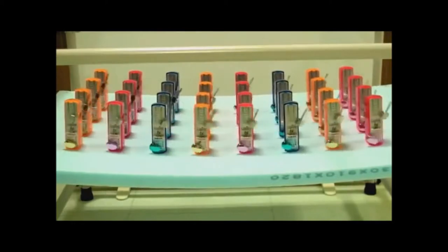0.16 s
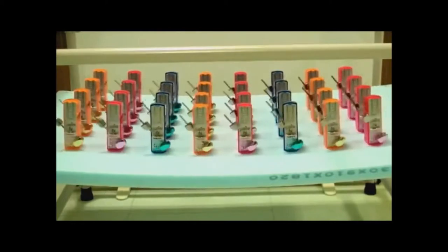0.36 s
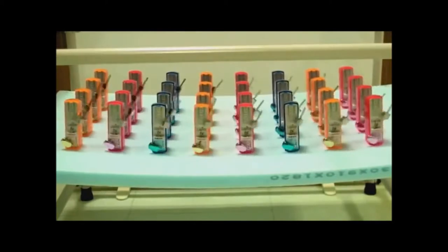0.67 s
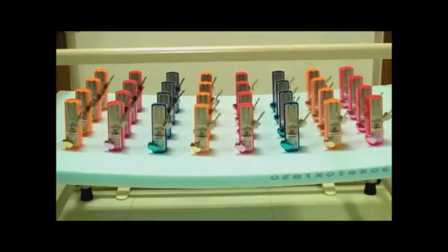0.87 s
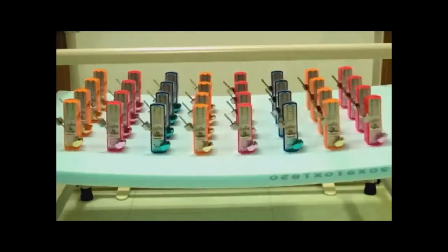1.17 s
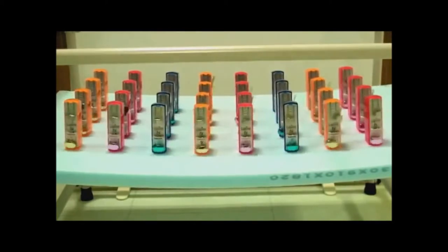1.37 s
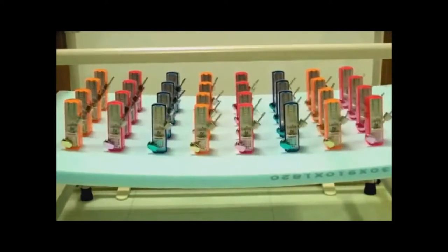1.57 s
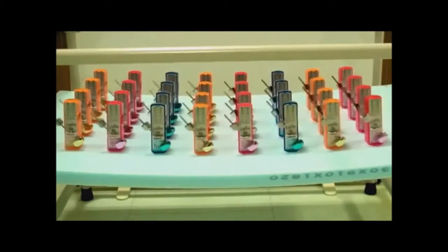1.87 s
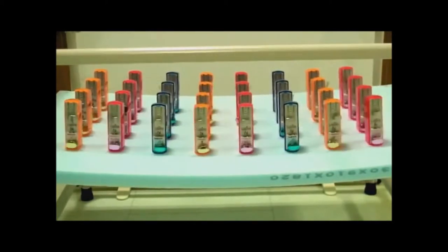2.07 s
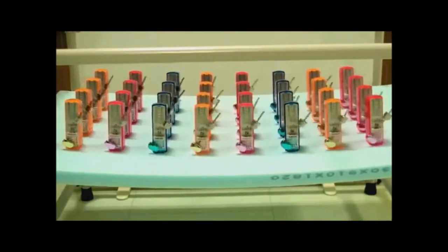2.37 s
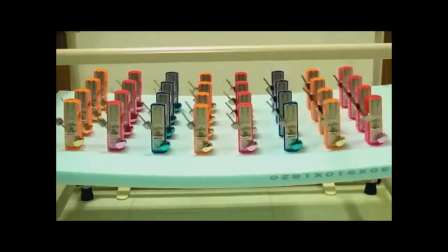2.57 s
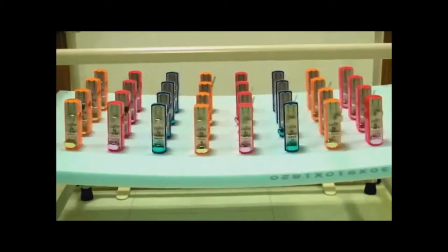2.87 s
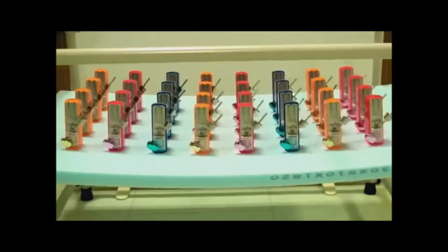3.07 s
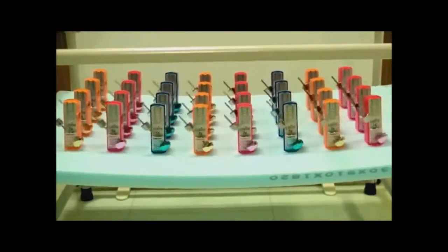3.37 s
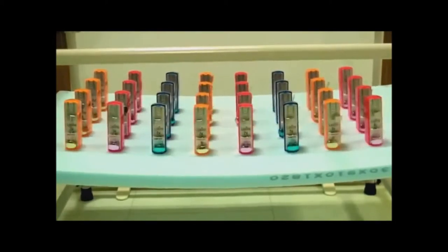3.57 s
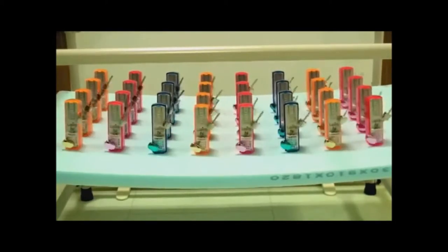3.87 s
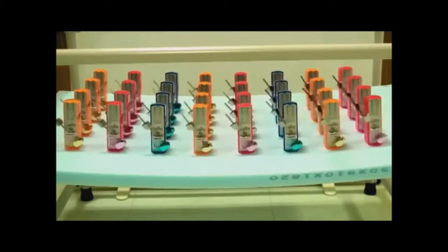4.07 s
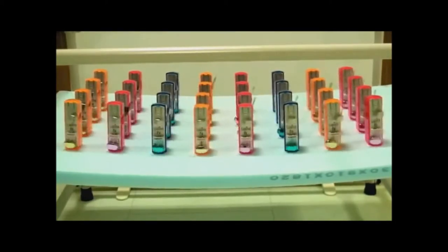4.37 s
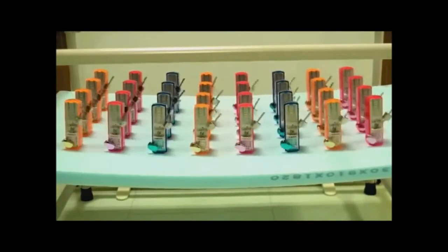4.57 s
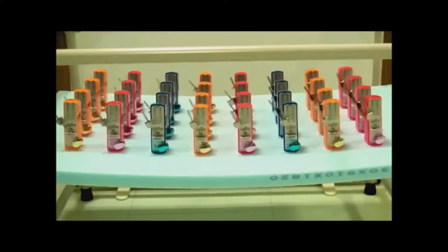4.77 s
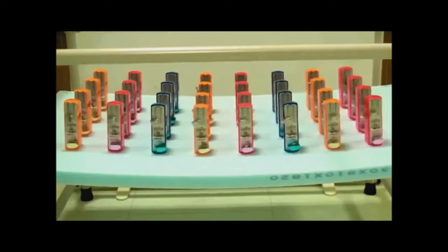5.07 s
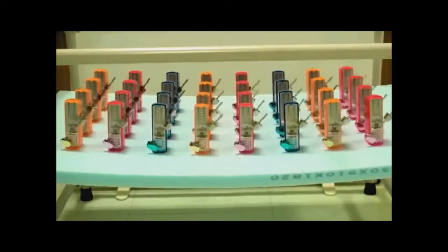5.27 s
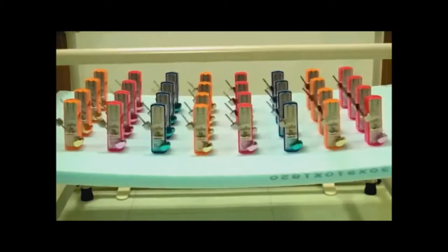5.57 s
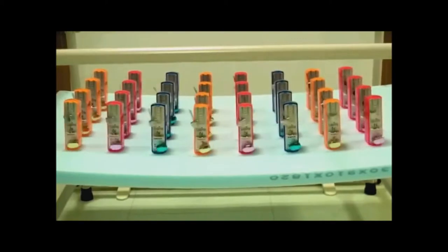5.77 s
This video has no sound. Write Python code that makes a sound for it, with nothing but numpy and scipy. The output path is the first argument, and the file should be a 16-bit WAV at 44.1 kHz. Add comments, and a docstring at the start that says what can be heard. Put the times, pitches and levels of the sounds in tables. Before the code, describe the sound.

Dozens of small plastic mechanical metronomes tick almost in step on a shared board, a little under three beats a second. Each beat is a brief clatter of sharp clicks with a slight ring and a light knock, alternating tick and tock. The pulse stays even throughout. The microphone is close, in a hard-walled room with a short echo and faint, steady ventilation.

```python
"""A hard-walled room opens on the dying tail of an earlier beat, over faint, steady ventilation.
Then thirty-two small plastic metronomes, swinging almost in step on a hanging board, tick sixteen beats.
Each beat swells out of a faint hiss into a tenth of a second of clatter: every escapement cracks,
rings its case near 1.9 kHz and knocks on the board. The room answers with a short tail and a low boom."""
import sys
import numpy as np
from scipy import signal
from scipy.fft import rfft, irfft, next_fast_len
from scipy.io import wavfile

SR = 44100
rng = np.random.default_rng(int(sys.argv[2]) if len(sys.argv) > 2 else 0)


def materialize(psi):
    """Save the field psi as 16-bit PCM at rate SR to the path in sys.argv[1].

    A 1-D psi becomes a single channel; in a 2-D psi each row is a channel.
    """
    bounded = np.clip(np.atleast_2d(psi).T, -1, 1)
    quanta = np.round(bounded * 32767).astype(np.int16)
    wavfile.write(sys.argv[1], SR, quanta)


N = 261513
TICK_T = np.arange(4096) / SR
TICK_HZ = np.fft.rfftfreq(len(TICK_T), 1 / SR)


def amp(db):
    """Decibels to gain."""
    return 10 ** (np.asarray(db) / 20)


def curve(points, hz):
    """Reads a table along a log-frequency axis."""
    f, value = np.transpose(points)
    return np.interp(np.log(hz + 1), np.log(f + 1), value)


def unit(x):
    """Scales each row to an energy of one."""
    return x / np.linalg.norm(x, axis=-1, keepdims=True)


def colour(x, eq):
    """A causal EQ of unit energy: its table sets only the tone."""
    log_gain = np.log(amp(curve(eq, abs(np.fft.fftfreq(4096, 1 / SR)))))
    taps = np.fft.ifft(np.exp(np.conj(signal.hilbert(log_gain)))).real
    return signal.oaconvolve(x, unit(taps[:len(taps) // 2])[None], axes=1)[:, :N]


# Stereo image of the room at full width: f/Hz, correlation between the microphones
ROOM_IMAGE = [(100, 0.59), (300, 0.91), (600, 1), (1200, 1), (1900, 0.77), (3000, 0.8), (4500, 0.28),
              (7000, -0.27), (12000, -0.41)]
def pair(x, width=0.63):
    """Blends two unrelated channels until they are as alike as at two close microphones."""
    size = next_fast_len(x.shape[1])
    a, b = rfft(x, size)
    apart = np.clip(width * (1 - curve(ROOM_IMAGE, np.fft.rfftfreq(size, 1 / SR))) / 2, 0, 1)
    mid, side = a * np.sqrt(1 - apart), b * np.sqrt(apart)
    return irfft([mid + side, mid - side], size)[:, :x.shape[1]]


# EQ of the opening tail, peaking where board and cases ring: f/Hz, level/dB
TAIL_EQ = [(100, -22), (300, -9), (430, 8), (1000, -10), (1600, -5), (1860, 8), (2200, -8),
           (5000, -8), (11000, -24)]
def opening_tail(db=-42, t60=1.0):
    """Fading noise: an earlier beat is still dying in the room."""
    noise = pair(rng.standard_normal((2, N)))
    return colour(noise, TAIL_EQ) * amp(db - 60 * np.arange(N) / SR / t60)


# EQ of the air bed: f/Hz, level/dB
AIR_EQ = [(20, -23), (45, -15), (80, 0), (160, 0), (280, -4), (450, 5.5), (1000, -3.5), (3000, -4.5),
          (7000, -12.5), (12000, -23.5)]
def ventilation(db=-50, side_db=-6):
    """A steady, soft rush of air."""
    mid, side = colour(rng.standard_normal((2, N)), AIR_EQ)
    return amp(db) * (mid + amp(side_db) * np.array([side, -side]))


# The pulse, forward and back swing in turn, cued on the first strike: t/s, level/dB
BEATS = [(.082, 1), (.438, -1), (.832, 0.5), (1.1871, -0.5), (1.5797, .5), (1.9356, -0.5), (2.3271, 1),
         (2.6836, -0.5), (3.0753, 0.5), (3.4297, 0), (3.8236, 0.5), (4.1762, -0.5), (4.5702, 1),
         (4.9253, -0.5), (5.3183, 0), (5.674, 0)]
# Foreground metronomes, a row each, relative to the beat:
# t/s, crack level/dB, ring level/dB on the forward swing, then the same on the back swing
NEAR_STRIKES = [(0, -14.5, -18, 0, -16, -25), (.007, -18, -25, .018, -18, -19.5),
                (0.0176, -17, -16.5, .027, -17.5, -20), (.026, -22.5, -22, .0315, -17, -26),
                (.032, -20.5, -22, .036, -16.5, -17), (.041, -18.5, -19.5, .047, -17, -18.5),
                (.046, -20, -29, .057, -17.5, -18.5), (0.0517, -19.5, -15, .063, -17, -14),
                (0.06, -23.5, -25, .073, -18.5, -14.5), (.065, -20.5, -19, .084, -16, -17.5),
                (.073, -20.5, -29, .095, -31.5, -19), (0.105, -23.5, -22, .103, -21, -25)]
def near_ticks(wander_s=.002, uneven_db=2):
    """The first metronome leads; the others stray a little. Gives times, crack and ring levels."""
    patterns = np.hsplit(np.array(NEAR_STRIKES), 2)
    follows = np.arange(len(NEAR_STRIKES)) > 0
    uneven = uneven_db * follows
    ticks = []
    for k, (start, db) in enumerate(BEATS):
        lag, crack, ring = patterns[k % 2].T
        stray, crack_luck, ring_luck = rng.uniform(-1, 1, (3, len(NEAR_STRIKES)))
        times = start + follows * (lag + wander_s * stray)
        ticks.append([times, db + crack + uneven * crack_luck, db + ring + uneven * ring_luck])
    return np.hstack(ticks)


def lead_in_hiss(ticks, swell_s=0.026, hiss_db=-20.5):
    """A faint hiss in the crack's colour swells into each near tick and softens its attack."""
    t, envelope = np.arange(N) / SR, np.zeros(N)
    for s, crack_db, _ in ticks.T:
        span = slice(round((s - swell_s) * SR), round(s * SR))
        envelope[span] += amp(crack_db + hiss_db) * np.sqrt(abs(1 - (s - t[span]) / swell_s))
    return colour(pair(rng.standard_normal((2, N))) * envelope, CRACK_EQ)


def decay(t60):
    """The envelope of a struck part."""
    return amp(-60 * TICK_T / t60)


def place(times, db, sounds, bearing, pan_db, mic_delay_s=1.8e-5):
    """Lays one hit at each time, panned to its bearing by delay and level."""
    gain = amp(db) * np.sqrt(.003 * SR)  # level as if the energy fell within 3 ms
    spectra = rfft(unit(sounds) * gain[:, None])
    lead = np.exp(1j * np.pi * mic_delay_s * bearing[:, None] * TICK_HZ)
    pan = lead * amp(pan_db * bearing[:, None])
    hits = irfft(np.stack([spectra * pan, spectra / pan], 1))
    fade = np.cos(np.pi / 2 * TICK_T / TICK_T[-1])
    out = np.zeros((2, N + SR))
    for s, hit in zip(times, hits):
        start = max(round(s * SR), 0)
        out[:, start:start + len(TICK_T)] += hit * fade
    return out[:, :N]


# Bright EQ of the escapement's crack: f/Hz, level/dB
CRACK_EQ = [(60, -51), (250, -30.5), (600, -7), (1050, -14), (1500, -3.5), (2200, 0), (2950, 2.5),
            (3450, -1), (4100, 1), (5000, -4), (5800, -2), (6500, -5), (8600, -7.5), (11000, -19.5)]
def cracks(times, db, bearing, rise_s=0.00019, snap_t60=0.029, rattle_t60=0.05, rattle_db=-13):
    """The pallet hits the escape wheel: a hard snap, then the works rattle briefly."""
    grain = rng.standard_normal((len(times), len(TICK_T)))
    attack = 1 - np.exp(-TICK_T / rise_s)
    burst = grain * attack * (decay(snap_t60) + amp(rattle_db) * decay(rattle_t60))
    return colour(place(times, db, burst, bearing, pan_db=-1.0), CRACK_EQ)


# Ringing modes of a plastic case: f/Hz, level/dB, t60/s
CASE_MODES = [(1836, -1, 0.04), (1908, -2.5, 0.061), (2052, -4, 0.021), (1498, -23.5, 0.044)]
def case_rings(times, db, bearing, detune=.013, low_cut_hz=900):
    """Each case rings a little off its neighbours; it is too small to radiate bass."""
    chance = rng.standard_normal((len(times), len(CASE_MODES), 2))
    ring = 0
    for k, (hz, mode_db, t60) in enumerate(CASE_MODES):
        own_hz = hz * (1 + detune * chance[:, k, :1])
        polarity = np.sign(chance[:, k, 1:])
        ring = ring + polarity * amp(mode_db) * decay(t60) * np.sin(2 * np.pi * own_hz * TICK_T)
    low_cut = signal.butter(2, low_cut_hz, "high", fs=SR, output="sos")
    return signal.sosfilt(low_cut, place(times, db, ring, bearing, pan_db=3.0))


# Low-mid body of the board: f/Hz, level/dB
BOARD_EQ = [(50, -45), (110, -32), (155, -16), (305, -19.5), (385, -0.5), (425, 0), (520, 0), (610, -1),
            (710, -0.5), (850, -8.5), (1400, -19.5), (3000, -50)]
# Tick-tock EQ, added on the higher back swing, subtracted on the forward swing: f/Hz, level/dB
TOCK_EQ = [(200, 0.5), (320, -2), (450, -1), (680, 1), (1000, -0.5)]
def board_knocks(times, db, bearing, t60=0.097, rise_s=0.00097):
    """The blow goes through the feet into the many low modes of the board."""
    swing = np.repeat(np.resize([-1, 1], len(BEATS)), len(times) // len(BEATS))  # -1 forward, +1 back
    grain = rng.standard_normal((len(times), len(TICK_T)))
    thud = grain * decay(t60) * (1 - np.exp(-TICK_T / rise_s))
    thud = irfft(rfft(thud) * amp(swing[:, None] * curve(TOCK_EQ, TICK_HZ)))
    return colour(place(times, db, thud, bearing, pan_db=2.0), BOARD_EQ)


def near_metronomes(ticks, crack_db=2.0, knock_db=-31.0):
    """Twelve foreground ticks stand out from each beat's clatter."""
    times, crack, ring = ticks
    bearing = rng.uniform(-1.2, 1, len(times))
    return (cracks(times, crack + crack_db, bearing) + case_rings(times, ring, bearing)
            + board_knocks(times, np.full(len(times), knock_db), bearing))


def far_metronomes(count=20, db=-24.5, crack_db=3.0, ring_db=-1, knock_db=-9.5, cluster_s=.081):
    """The background crowd fills each beat with a cluster of ticks, then softer stragglers."""
    start, beat_db = np.transpose(BEATS)[:, :, None]
    lag_s = np.resize((.004, .024), start.shape)  # forward, back swing
    jitter, scatter, side = np.moveaxis(rng.uniform(-1, 1, (len(BEATS), count, 3)), 2, 0)
    lateness = 1.5 * (np.arange(count) + (1 + jitter) / 2) / count  # in cluster lengths
    times = (start + lag_s + cluster_s * lateness).ravel()
    straggler_db = -12 * np.clip((lateness - .95) / 0.33, 0, 1)
    level = (db + beat_db + 2 * scatter + straggler_db).ravel()
    bearing = side.ravel()
    return (cracks(times, level + crack_db, bearing) + case_rings(times, level + ring_db, bearing)
            + board_knocks(times, level + knock_db, bearing))


def reflections(t60_points, predelay_s, width, density=.12, frame=256):
    """Sparse echoes of random sign, each band dying at its own speed."""
    taps = rng.choice([-1., 1.], (2, SR)) * (rng.random(SR) < density)
    taps *= np.arange(SR) > predelay_s * SR
    hz, t, bands = signal.stft(pair(taps, width), SR, nperseg=frame)
    bands = bands * amp(-60 * t / curve(t60_points, hz)[:, None])
    return unit(signal.istft(bands, SR, nperseg=frame)[1])


# Decay of the room's reverb: f/Hz, t60/s
REVERB_DECAY = [(100, 1), (220, 0.67), (500, 0.73), (1100, 0.62), (1850, 0.82), (3700, 0.67), (7000, 0.77),
                (11000, .5)]
# Warm EQ of that reverb: f/Hz, level/dB
REVERB_EQ = [(100, 5), (210, 11.5), (420, 8), (700, 3.5), (1100, 8), (1500, -2.5), (1850, -1), (2400, -3),
             (3500, -0.5), (7000, -3), (11000, -3)]
def room(dry, early_db=-3.5, early_t60=0.15, tail_db=-10.0, crossfade_s=.012, count=8):
    """Quick echoes from the frame and the floor ahead, then a wide tail."""
    wet = 0
    tail_eq = amp(curve(REVERB_EQ, np.fft.rfftfreq(2 * SR, 1 / SR)))
    turn = np.arange(N) / SR / crossfade_s
    for k in range(count):
        # successive ticks come from different places on the board, each with its own echoes
        send = np.sin(np.pi / 2 * np.minimum((turn - k) % count, 2))
        early = reflections([(100, early_t60), (10000, early_t60)], predelay_s=0.0022, width=0.028)
        tail = reflections(REVERB_DECAY, predelay_s=0.019, width=1)
        tail = irfft(rfft(tail, 2 * SR) * tail_eq)
        response = amp(early_db) * early[:, :SR] + amp(tail_db) * tail[:, :SR]
        wet = wet + signal.fftconvolve((dry * send)[None], response, axes=1)[:, :N]
    return wet


def boom(hz=210, db=-52.0, swell_s=0.09, delay_s=.035, detune=0.029, back_swing_db=3):
    """A low room resonance blooms after each beat and dies away, stronger on the back swing."""
    t, out = np.arange(N) / SR, np.zeros(N)
    for k, (s, _) in enumerate(BEATS):
        offset, phase = rng.uniform(-1.07, 1, 2)
        span = (t > s + delay_s) & (t < s + 1)
        age = t[span] - s - delay_s
        envelope = (age / swell_s) ** 2 * np.exp(2 * (1 - age / swell_s))
        tone = np.sin(2 * np.pi * hz * (1 + detune * offset) * age + np.pi * phase)
        out[span] += amp(db + back_swing_db * (k % 2)) * envelope * tone
    return out


def scene():
    """The mix: all the metronomes in their room, over the air bed."""
    ticks = near_ticks()
    direct = near_metronomes(ticks) + far_metronomes() + lead_in_hiss(ticks)
    return direct + room(direct.mean(0)) + boom() + opening_tail() + ventilation()


def record(dry, balance_db=-0.3, ceiling=0.94, notch_hz=7900, notch_width_hz=230, high_cut_hz=11550):
    """A soft clip rounds the peaks; the treble gets a narrow notch and a steep high cut."""
    balanced = dry * amp([[balance_db / 2], [-balance_db / 2]])
    rounded = ceiling * np.tanh(balanced / ceiling)
    edges = [notch_hz - notch_width_hz / 2, notch_hz + notch_width_hz / 2, high_cut_hz]
    taps = signal.firwin(701, edges, window=("kaiser", 8), fs=SR)
    return signal.oaconvolve(rounded, taps[None], "same", axes=1)


dry = scene()
out = record(dry)
materialize(out)
```